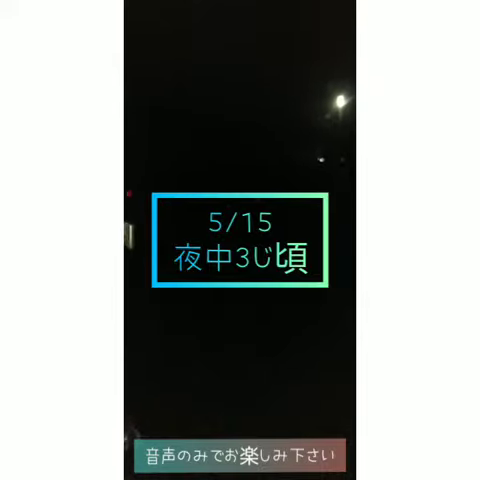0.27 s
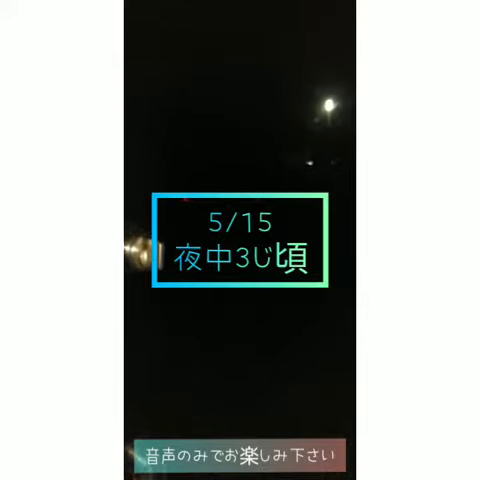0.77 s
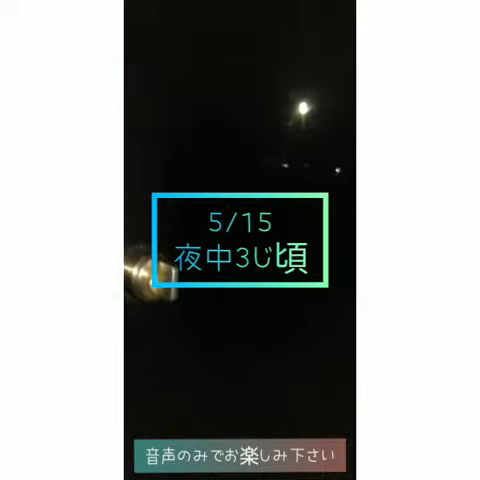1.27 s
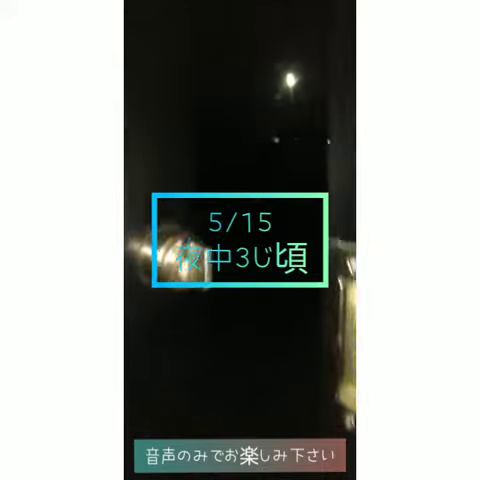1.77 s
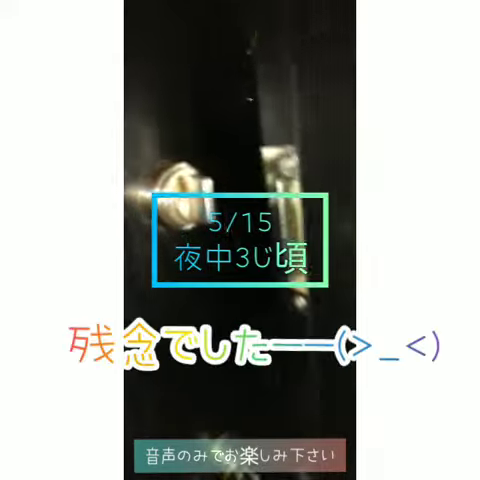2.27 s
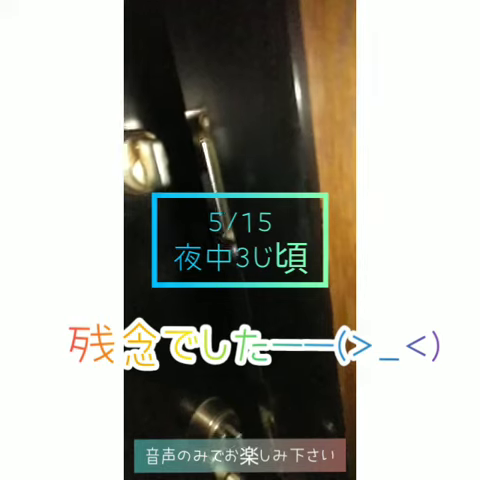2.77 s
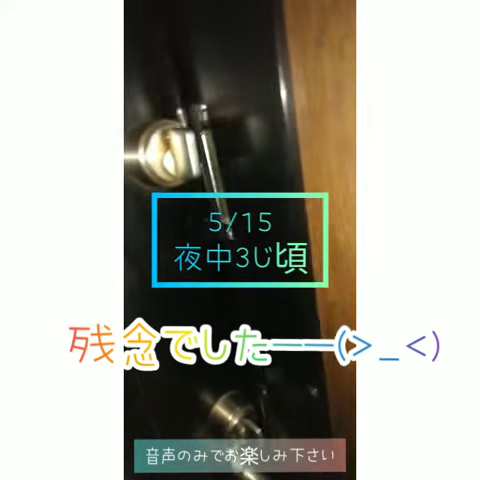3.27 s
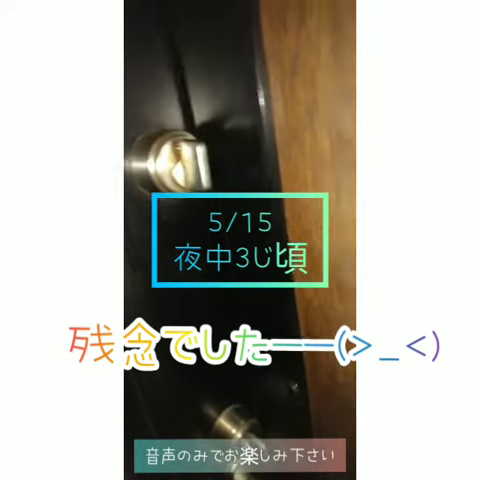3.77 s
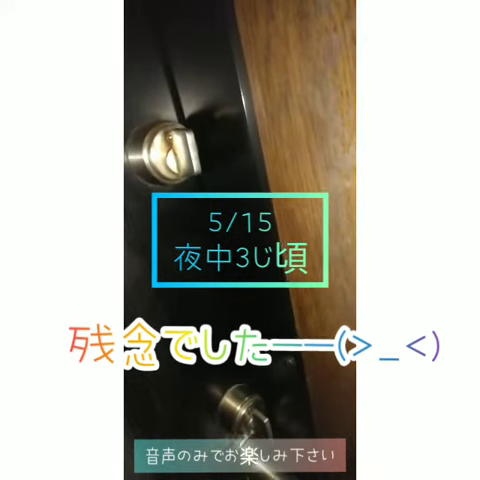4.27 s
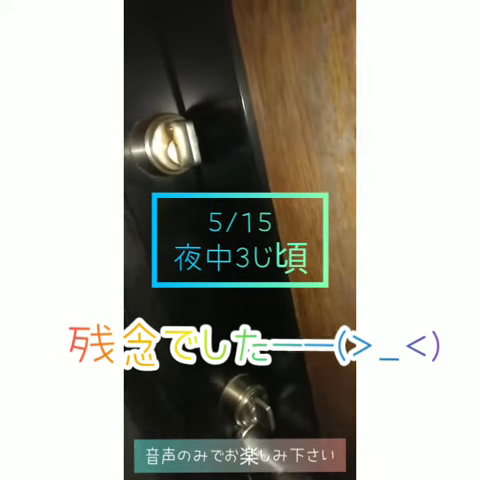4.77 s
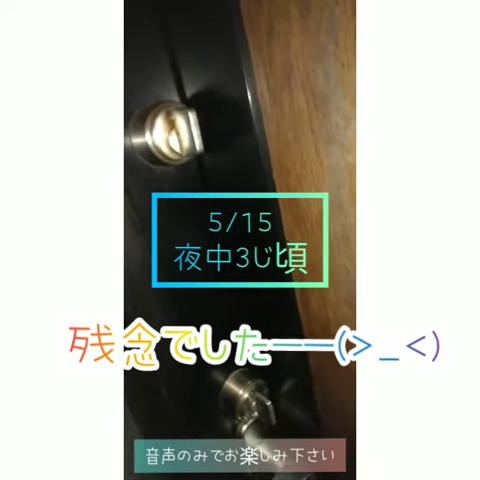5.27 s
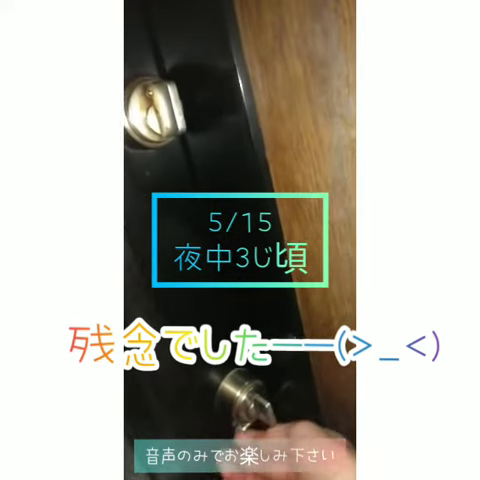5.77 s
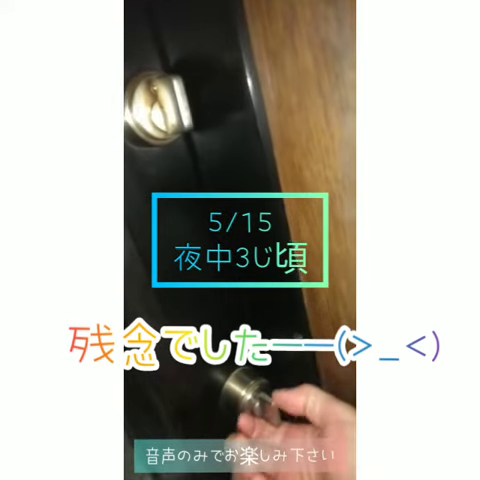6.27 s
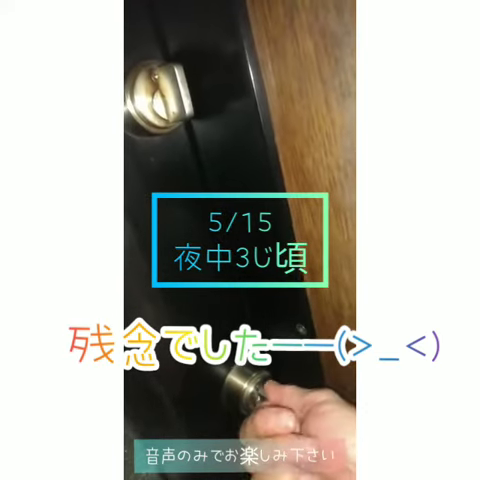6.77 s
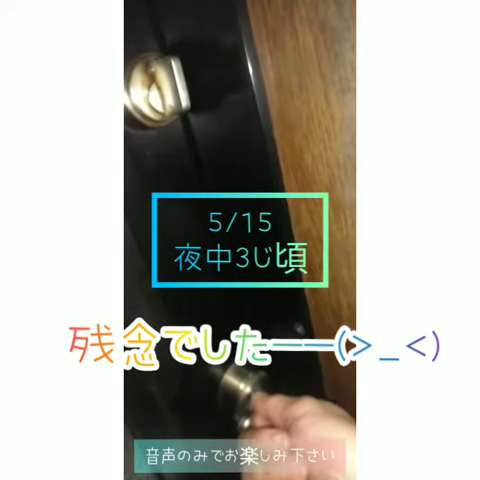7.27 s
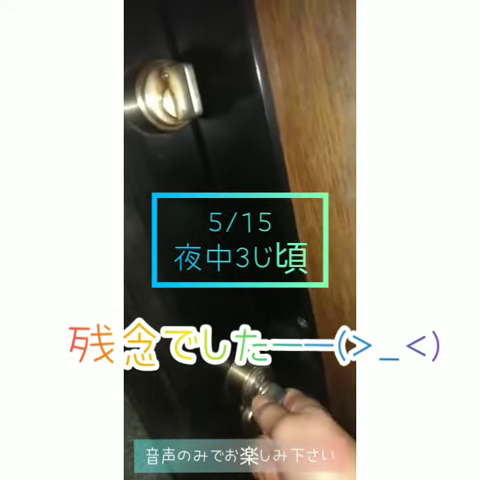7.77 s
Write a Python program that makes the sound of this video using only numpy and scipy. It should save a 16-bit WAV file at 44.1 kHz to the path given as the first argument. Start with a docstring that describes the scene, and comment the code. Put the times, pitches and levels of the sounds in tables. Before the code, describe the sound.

In a quiet hallway, the loose metal fittings of a front door give a few light, ringing clicks. The door is pulled and thumps against its bolt with a short low rumble. Then the knob knocks and rattles irregularly, squeaks briefly and snaps over with a sharp click. The microphone is close, with soft hand rubbing and faint hiss underneath.

```python
"""Quiet hallway, close to a front door whose metal knob and latch are handled. Loose fittings click,
the door thumps against its bolt and rumbles on its seals, then the knob knocks in its play, squeaks
(stick-slip) and snaps over. Each contact rings lock and leaf; hard ones also ring single parts.
The hand rubs and ticks; the microphone takes a few dull handling bumps.
Faint rumble, hiss and hum lie underneath."""
import sys
import numpy as np
from scipy import signal
from scipy.fft import rfft, irfft, next_fast_len
from scipy.io import wavfile
from scipy.ndimage import map_coordinates

SR = 44100
rng = np.random.default_rng(int(sys.argv[2]) if len(sys.argv) > 2 else 0)


def wrap_up_sound(samples):
    """Save the sound to the file named by the first command line argument, as 16-bit audio."""
    columns = np.atleast_2d(samples).T
    # keep every value between -1 and 1, then stretch to whole-number steps
    tamed = np.clip(columns, -1, 1)
    steps = np.round(tamed * 32767).astype(np.int16)
    wavfile.write(sys.argv[1], SR, steps)


N = 354123
TOP_HZ = 15900

# Noise spectra: f/Hz, relative density/dB
ROOM_SPECTRUM = [(26, -36), (43, -7), (58, 6), (85, -2), (160, -2.5), (300, -7), (600, -21.5), (2000, -66),
                 (8000, -28.5), (15500, -24)]
LOW_HISS_SPECTRUM = [(200, -18), (450, -1), (580, 1.5), (660, 3.5), (850, -3.5), (1130, 0.5), (1900, -11.5),
                     (3500, -29.5)]  # also skin on the door
HIGH_HISS_SPECTRUM = [(1000, -1.5), (1900, 3), (2400, 4), (3200, 3.5), (4000, -2), (5200, -0.5),
                      (6500, -4.5), (8500, -12.5), (15000, -11.5)]
FIZZ_SPECTRUM = [(3000, -35), (8000, -2), (13000, -8), (15500, -12)]
SWAY_SPECTRUM = [(29, -40), (41, 1), (55, 7), (75, 1.5), (105, -7), (180, -0.5), (260, -20), (400, -50)]  # leaf on its seals
# High hiss envelope: t/s, level/dB
HIGH_HISS_LEVELS = [(0, -54.5), (2.1, -57.5), (3.6, -60.5), (8.03, -61)]
# Dull, dry handling bumps on the microphone: t/s, level/dB
MIC_BUMPS = [(2.251, -39.5), (2.542, -37.5), (5.898, -32), (7.334, -38.5)]
# Hand strokes on door and fittings: centre t/s, length/s, level/dB
HAND_RUBS = [(.88, 0.65, -59), (3.922, 0.3, -59), (4.724, 0.4, -56), (5.15, 0.57, -59.5), (5.97, 0.33, -57),
             (6.8, 0.48, -60), (7.78, 0.78, -51.5)]
# Pulls that sway the leaf: t/s, level/dB
DOOR_PULLS = [(3.725, -36), (3.955, -48.5), (4.2, -46)]
# Slips of the dry spindle: t/s, length/s, f/Hz, glide/(Hz/s), level/dB
SPINDLE_SLIPS = [(5.694, .028, 8380, -1500, -58), (5.96, .019, 8220, 6000, -57),
                 (7.469, .039, 3425, 0, -42.5), (7.505, .044, 3480, -900, -44),
                 (7.545, .034, 2870, -6000, -35), (7.58, .019, 2700, 5000, -39.5),
                 (7.707, .032, 2560, -4000, -44)]
# Small door parts, by name: f/Hz, t60/s, mode spread/fraction of f
PART_MODES = {"panel": (500, .1, .12), "bolt": (945, .12, .035), "case": (1075, .12, .03),
              "plate": (1184, .09, .02), "rose": (1330, .15, .032), "bar": (1460, .17, .04),
              "strike": (2300, .08, .17), "spring": (2700, .11, .05), "guard": (5200, .12, .08),
              "pin": (6360, .028, .035), "tip": (8550, .03, .04), "catch": (10800, .022, .17)}
# Hard touches on one part: t/s, part name, level/dB
PART_HITS = [(0.735, "bar", -38), (.86, "catch", -48), (1.498, "guard", -39.5), (1.961, "bar", -35.5),
             (1.961, "strike", -34), (2.783, "strike", -48), (3.749, "guard", -32), (3.752, "catch", -38),
             (3.752, "strike", -35), (3.891, "catch", -41), (3.892, "strike", -30), (3.894, "pin", -28.5),
             (4.185, "pin", -39), (4.526, "pin", -40), (4.593, "panel", -36), (4.674, "panel", -41.5),
             (4.785, "pin", -27), (4.786, "plate", -32), (4.787, "strike", -35.5), (4.869, "catch", -47),
             (5.362, "pin", -28.5), (5.361, "spring", -32), (5.658, "tip", -24), (5.661, "rose", -37),
             (5.914, "rose", -24.5), (5.914, "bolt", -26), (6.78, "pin", -34), (7.546, "tip", -42),
             (7.679, "pin", -20.5), (7.679, "catch", -25), (7.681, "case", -23.5), (7.681, "rose", -26.5)]
# Resonances of leaf and lock: f/Hz, width/Hz, lift/dB
DOOR_MODES = [(171, 23, 2), (218, 58, 10), (343.8, 8, 9.5), (423, 39, 6), (523, 100, 9.5), (624, 22, 11),
              (943, 16, 2.5), (1152, 98, 5), (1347, 26, 6.5), (1733, 34, 3.5), (2173, 54, 6.5),
              (2512, 81, 7.5), (2840, 53, 7.5), (3110, 81, 5.5), (5170, 170, 5), (6230, 210, 2),
              (8240, 1600, 2), (9770, 390, 5)]
# Door bands, low to high: low f/Hz, high f/Hz, chatter t60/s, hallway level/dB, hallway t60/s
DOOR_BANDS = [(50, 124, 0.12, -6, 0.59), (126, 309, 0.17, -12.5, 0.41), (365, 970, 0.11, -7.5, 0.31),
              (926, 1900, 0.11, -8.5, 0.32), (1870, 4040, 0.091, -14.5, 0.35),
              (4210, 7080, 0.066, -13, 0.21), (7400, 14400, 0.051, -20, 0.26)]
# Touch response per band: level/dB, weight slope/(dB/dB), hardness slope/(dB/dB)
BAND_RESPONSE = [(-28.5, 1.67, 0), (-5.8, 1, 0), (-1.3, .5, -0.43), (0.5, 0, 0), (-3.2, 0.0826, 0.5),
                 (-9.5, 0, 1), (-18.5, -.06, 0.98)]
# Metal-door contacts: t/s, level/dB, weight/dB, hardness/dB, chatter t60 factor, rise/s (long = scuff)
# Fittings click; door pulled from 3.7 s; knob rattled from 4.5 s, turned from 6.5 s; snap at 7.7 s.
DOOR_CONTACTS = [ (.566, -57, -2, 14.5, .55, .001), (.735, -40.5, -13, -3, .9, .0003),
                 (.818, -43.5, -11, -11, .7, .0004), (.857, -41.5, -21, 0, 1.2, .0045),
                 (.897, -42.5, -11, -6.5, .7, .0025), (1.298, -49, -25, 0, .45, .002),
                 (1.311, -53, -22, 4, .7, .002), (1.485, -47, -3, 7, .75, .003),
                 (1.498, -48, 1.5, 11.5, .75, .002), (1.535, -50.5, -20, -5, .6, .0046),
                 (1.651, -51, -18, -11, 1.3, .0014), (1.96, -42.5, -8, 3, 1.15, .0003),
                 (2.783, -64.5, -4, 10, .45, .0003), (3.507, -57.5, 2, 10, .7, .0008),
                 (3.728, -39.5, 0, -.5, 1.15, .0023), (3.749, -41.5, 11, 10.5, 1.3, .0005),
                 (3.767, -42.5, 2, 4.5, 2.3, .003), (3.89, -42, -7, 7, 1.1, .0006),
                 (3.97, -61.5, 19.5, 5, 1.9, .009), (4.019, -54.5, -4, -2, 1.4, .01),
                 (4.184, -59, 5, 11.5, 1.2, .0016), (4.21, -62.5, 22.5, 1, .75, .004),
                 (4.502, -43.5, -1, -8, .8, .0004), (4.526, -39, 0.5, 0, 1.75, .0013),
                 (4.564, -48, 2, -2, .7, .0017), (4.593, -52, 15, -6, .5, .001),
                 (4.673, -64.5, 19, -10, .36, .0013), (4.785, -40.5, 15, .5, .58, .0011),
                 (4.868, -48, 17.5, 6, .66, .0008), (4.969, -62, 18, 0, 1, .003),
                 (5.346, -50, 21.5, 1, .65, .0055), (5.361, -45, 14, -1.5, .36, .0014),
                 (5.655, -46, 10, 7, .95, .003), (5.911, -36.5, 5, -3, .47, .0012),
                 (5.917, -34, 0, -7, .54, .0018), (6.015, -54, 12, -9, .36, .0006),
                 (6.095, -56.5, 7.5, 3, 1.4, .0027), (6.134, -60, 17, -9, .8, .007),
                 (6.257, -55.5, 6.5, -2, .85, .004), (6.484, -48, -18, -18, .5, .0018),
                 (6.564, -55, -14, -2, .7, .001), (6.591, -56, 8, 0, .7, .0025),
                 (6.78, -43.5, 8.5, -3.5, 1.7, .0017), (6.906, -47, -3, -5, .95, .0005),
                 (7.261, -50.5, -21, -6, .7, .0018), (7.285, -55.5, -9, 3.5, .55, .0012),
                 (7.435, -55.5, -14, 4, 1.1, .0018), (7.463, -51.5, 9, -4, 1.2, .0007),
                 (7.524, -50, -9, 2, .8, .002), (7.545, -45.5, 6, -1, 1.15, .00045),
                 (7.606, -48, -12, -12, .76, .0016), (7.679, -34.5, 5.5, 2, 1.5, .00045),
                 (7.779, -50.5, 5.5, 6, .7, .0036), (7.922, -49, -2, -1, .75, .0008)]


def amp(db):
    """dB to gain."""
    return 10 ** (np.asarray(db) / 20)


def unit(x):
    """Scale to rms 1."""
    return x / np.sqrt(np.mean(x ** 2) + 1e-20)


def wobble(rate_hz):
    """Smooth random curve, knots at rate_hz."""
    knots = rng.standard_normal(int(N * rate_hz / SR) + 4)
    return map_coordinates(knots, [np.arange(N) * rate_hz / SR])


def swell(centre_s, length_s):
    """Half-cosine window, peak 1."""
    return np.cos(np.pi * np.clip((np.arange(N) / SR - centre_s) / length_s, -.5, .5))


def ring_envelope(t, rise_s, t60_s):
    """Exponential rise and decay."""
    return (1 - np.exp(-t / rise_s)) * amp(-60 * t / t60_s)


def filtered(x, response):
    """FFT filter with gain response(hz)."""
    size = next_fast_len(N + 8192)
    return irfft(rfft(x, size) * response(np.fft.rfftfreq(size, 1 / SR)), size)[..., :N]


def bandpass(x, low_hz, high_hz):
    """Butterworth band-pass."""
    sos = signal.butter(3, [low_hz, min(high_hz, .45 * SR)], 'bandpass', fs=SR, output='sos')
    return signal.sosfilt(sos, x)


def noise(spectrum):
    """Coloured noise, rms 1."""
    f_hz, db = np.transpose(spectrum)
    white = rng.standard_normal(N)
    return unit(filtered(white, lambda hz: amp(np.interp(np.log(hz + 1), np.log(f_hz), db))))


def background(rumble_db=-60, low_hiss_db=-66, flutter_db=0.2):
    """Room rumble, low hiss and a high hiss that eases off."""
    low_hiss = amp(low_hiss_db + flutter_db * wobble(12)) * noise(LOW_HISS_SPECTRUM)
    high_hiss_db = np.interp(np.arange(N) / SR, *np.transpose(HIGH_HISS_LEVELS))
    high_hiss = amp(high_hiss_db) * noise(HIGH_HISS_SPECTRUM)
    return amp(rumble_db) * noise(ROOM_SPECTRUM) + low_hiss + high_hiss


def hum(level_db=-71, f_hz=748, drift=0.0018, start_s=1.5, rise_s=1.2):
    """A thin, wavering tone fades in and stays."""
    phase = 2 * np.pi * np.cumsum(f_hz * (1 + drift * wobble(12))) / SR
    fade_in = np.clip((np.arange(N) / SR - start_s) / rise_s, 0, 1)
    return amp(level_db) * fade_in * unit(np.sin(phase))


def fizz(level_db=-64.5, centre_s=1.92, length_s=0.68):
    """The top of the hiss swells briefly."""
    return amp(level_db) * swell(centre_s, length_s) * noise(FIZZ_SPECTRUM)


def mic_bumps(gain_db=2, f_hz=220, rise_s=0.00099, t60_s=0.022):
    """Dull, dry handling bumps on the microphone: one or two low swings each."""
    t = np.arange(SR // 10) / SR
    thud = np.sin(2 * np.pi * f_hz * t) * ring_envelope(t, rise_s, t60_s)
    out = np.zeros(N)
    for start_s, db in MIC_BUMPS:
        out[round(start_s * SR):][:len(t)] += amp(gain_db + db) * thud
    return out


def hand_rubs(gain_db=-1, flutter_db=0.8):
    """Skin slides over the door in soft, uneven strokes."""
    pressure = sum(amp(db) * swell(centre_s, length_s) for centre_s, length_s, db in HAND_RUBS)
    return pressure * amp(gain_db + flutter_db * wobble(12)) * noise(LOW_HISS_SPECTRUM)


def fingertips(level_db=-59, spread_db=2, t60_s=.025, band_hz=(2800, 6500), span_s=(5.7, 5.8), count=14):
    """Fingers work at the lock: tiny random ticks."""
    t = np.arange(SR // 20) / SR
    out = np.zeros(N)
    for _ in range(count):
        tick = unit(bandpass(rng.standard_normal(len(t)), *band_hz)) * amp(-60 * t / t60_s)
        start = round(rng.uniform(*span_s) * SR)
        out[start:][:len(t)] += amp(level_db + spread_db * rng.standard_normal()) * tick
    return out


def leaf_shudder(gain_db=0.5, rise_s=0.0074, t60_s=0.71):
    """After each pull the leaf rumbles on its seals and settles."""
    sway = np.zeros(N)
    for start_s, db in DOOR_PULLS:
        age_s = np.maximum(np.arange(N) / SR - start_s, 0)
        sway += amp(gain_db + db) * ring_envelope(age_s, rise_s, t60_s)
    return sway * noise(SWAY_SPECTRUM)


def spindle_squeaks(gain_db=-1, harmonics_db=(0, -24, -23), waver=0.005, rough_db=1.5,
                    echo_db=-11, echo_t60_s=0.44):
    """Dry metal sticks and slips: gliding, wavering whistles with a short echo."""
    t = np.arange(N) / SR
    jitter = 1 + waver * wobble(300)
    grip = amp(rough_db * wobble(200))
    out = np.zeros(N)
    for start_s, length_s, f_hz, glide_hz_per_s, db in SPINDLE_SLIPS:
        envelope = grip * np.sqrt(np.abs(swell(start_s + length_s / 2, length_s)))
        pitch_hz = f_hz + glide_hz_per_s * np.clip(t - start_s, 0, length_s)
        phase = 2 * np.pi * np.cumsum(pitch_hz * jitter) / SR
        for k, harmonic_db in enumerate(harmonics_db, 1):
            if k * f_hz < TOP_HZ:
                out += envelope * amp(gain_db + db + harmonic_db) * np.sin(k * phase)
    tail = rng.standard_normal(SR // 2) * amp(-60 * t[:SR // 2] / echo_t60_s)
    echo = signal.fftconvolve(out, tail / np.linalg.norm(tail))[:N]
    return out + amp(echo_db) * echo


def part_pings(gain_db=-2, rise_s=0.0005, mode_count=14):
    """A struck part rings in a cluster of modes, soon damped by its housing."""
    t = np.arange(SR // 4) / SR
    out = np.zeros(N + len(t))
    for start_s, part, db in PART_HITS:
        f_hz, t60_s, spread = PART_MODES[part]
        cluster_hz = f_hz * (1 + spread * rng.standard_normal((mode_count, 1)))
        modes = np.sin(2 * np.pi * (cluster_hz * t + rng.random((mode_count, 1))))
        envelope = ring_envelope(t, rise_s, t60_s)
        envelope_rms = np.sqrt(np.mean(envelope ** 2))
        ring = envelope_rms * unit(envelope * modes.sum(axis=0))
        out[round(start_s * SR):][:len(t)] += amp(gain_db + db) * ring
    return out[:N]


def door_response(scatter_db=3):
    """Impulse response of leaf and lock; each contact point favours different modes."""
    response = signal.unit_impulse(SR // 6)
    for f_hz, width_hz, lift_db in DOOR_MODES:
        lift = amp(lift_db + scatter_db * rng.standard_normal())
        mode = signal.lfilter(*signal.iirpeak(f_hz, f_hz / width_hz, SR), response)
        response += (lift - 1) * mode
    return response


def door_contacts(gain_db=-14, crack_db=13, crack_t60_s=0.0048):
    """Each contact cracks, chatters through lock and leaf, and dies away in the hallway."""
    size = SR // 2
    t = np.arange(size) / SR
    crack = amp(crack_db - 60 * t / crack_t60_s)
    out = np.zeros(N + size)
    for start_s, level_db, weight_db, hardness_db, t60_factor, rise_s in DOOR_CONTACTS:
        # Weight lifts the low bands, hardness the high ones.
        bands_db = [level_db + db + weight_slope * weight_db + hardness_slope * hardness_db
                    for db, weight_slope, hardness_slope in BAND_RESPONSE]
        door = door_response()
        attack = 1 - np.exp(-t / rise_s)
        for band_db, (low_hz, high_hz, t60_s, hall_db, hall_t60_s) in zip(bands_db, DOOR_BANDS):
            chatter = amp(-60 * t / (t60_s * t60_factor))
            hallway = amp(hall_db - 60 * t / hall_t60_s)
            # Dense modes blur into noise.
            burst = attack * (crack + chatter + hallway) * rng.standard_normal(size)
            ring = signal.fftconvolve(bandpass(burst, low_hz, high_hz), door)[:size]
            out[round(start_s * SR):][:size] += amp(gain_db + band_db) * unit(ring)
    return out[:N]


def scene():
    """One microphone close to the lock feeds both channels."""
    room = background() + hum() + fizz()
    hand = hand_rubs() + fingertips()
    door = leaf_shudder() + spindle_squeaks() + part_pings() + door_contacts()
    mono = room + mic_bumps() + hand + door
    return np.array([mono, mono])


def record(dry):
    """Brick-wall low-pass at TOP_HZ."""
    return filtered(dry, lambda hz: hz < TOP_HZ)


dry = scene()
out = record(dry)
wrap_up_sound(out)
```